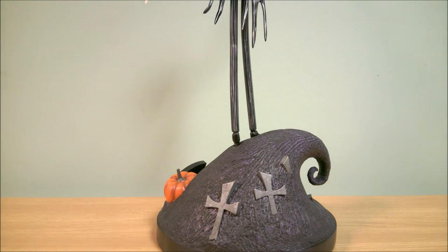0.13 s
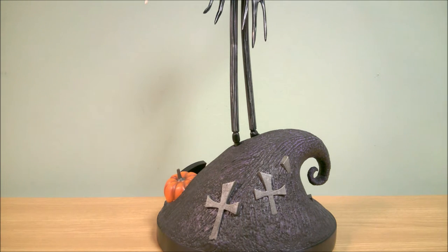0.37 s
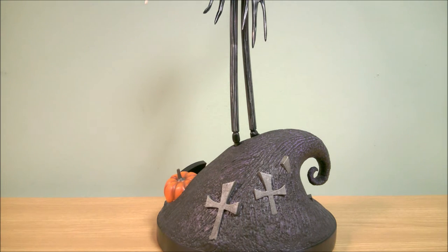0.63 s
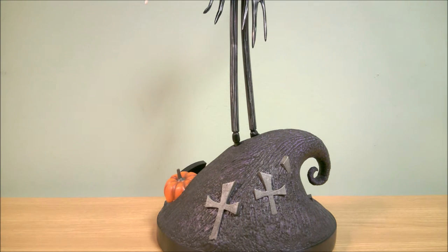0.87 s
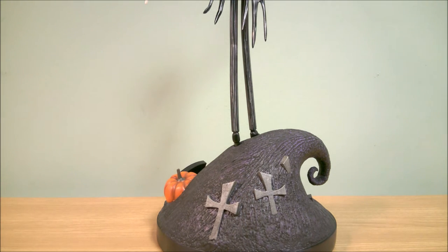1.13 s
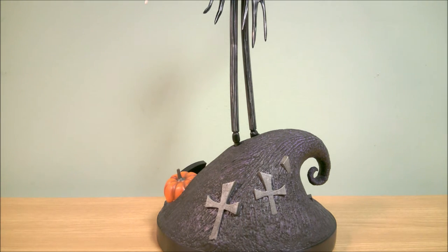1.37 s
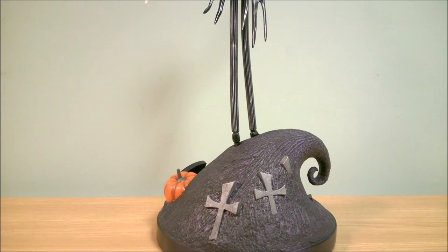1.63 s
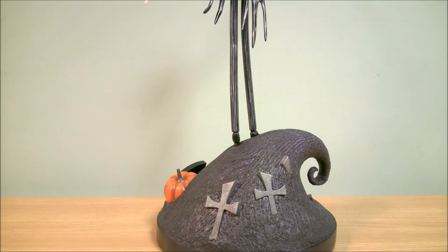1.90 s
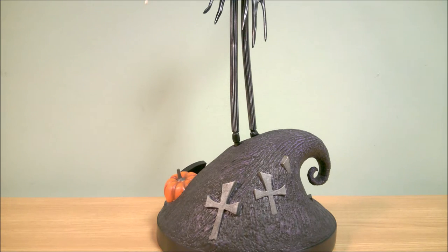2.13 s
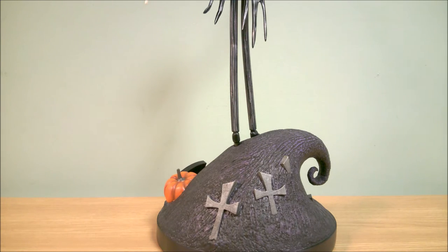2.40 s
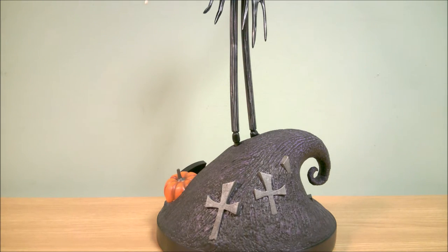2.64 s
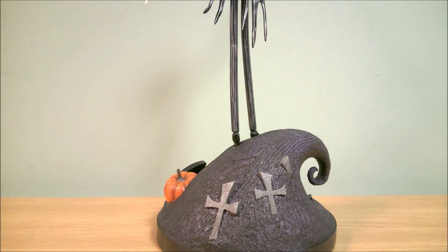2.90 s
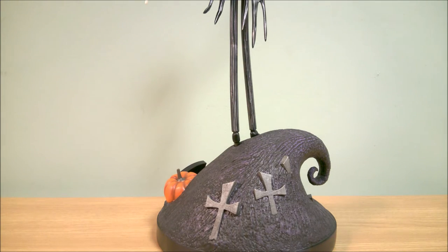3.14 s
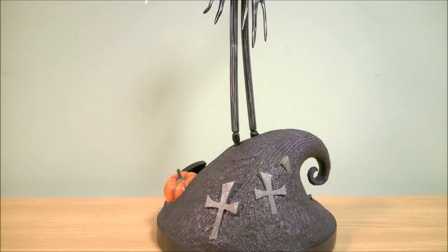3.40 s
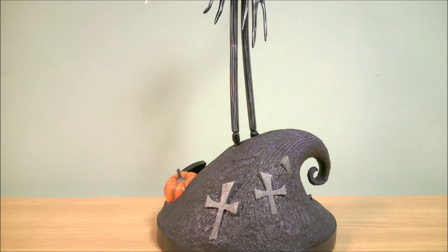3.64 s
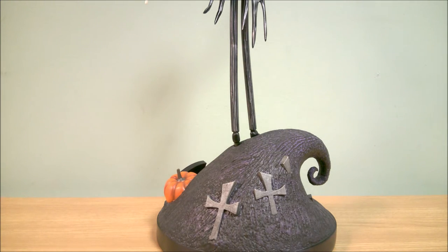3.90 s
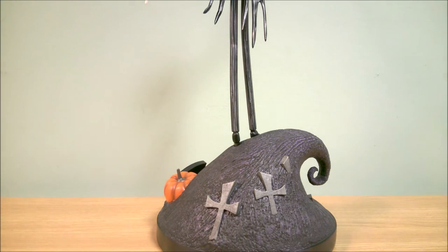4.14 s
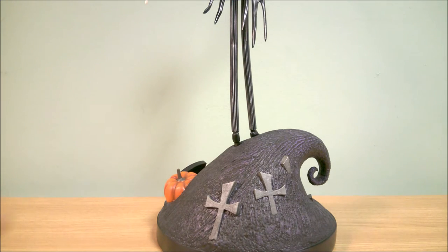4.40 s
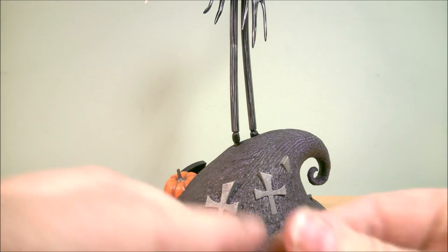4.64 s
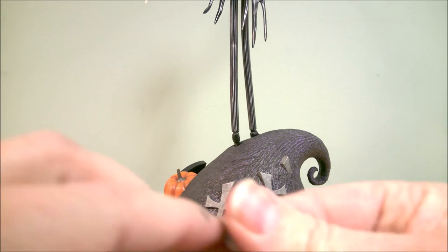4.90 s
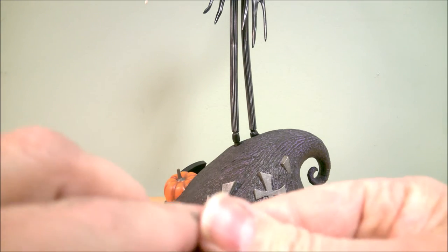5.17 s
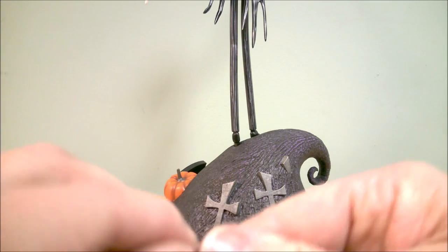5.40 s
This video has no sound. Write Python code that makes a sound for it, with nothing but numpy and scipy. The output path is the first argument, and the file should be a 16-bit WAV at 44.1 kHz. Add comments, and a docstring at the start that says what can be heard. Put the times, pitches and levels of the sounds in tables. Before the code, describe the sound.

Tacky crinkling clicks come in uneven clusters, some sharp and loud, with small hollow pops and grainy scuffs between. Soft table bumps sit under the start. Later it is nearly quiet until two wooden thumps with a low wobble, then a few tiny ticks. Close, dry, small-room sound with soft hiss and a very faint motor whine.

```python
"""Fingers knead sticky putty near a small camera in a quiet room: the skin lets go in short ringing snaps
with a treble tick, larger air pockets pop lower, and grainy noise bands make the rubbing in between.
Hands and arms bump the wooden table, twice hard: decaying modes ring while the whole table sways.
Behind it lie coloured hiss, low shaking, a wavering room hum and the faint harmonics of the camera's motor."""
import sys
import numpy as np
from scipy import signal
from scipy.fft import rfft, irfft
from scipy.io import wavfile

SR = 44100
rng = np.random.default_rng(int(sys.argv[2]) if len(sys.argv) > 2 else 0)


def level_to_linear(level):
    """Convert decibel levels to linear amplitude factors, elementwise."""
    exponent = np.asarray(level, float) / 20
    return 10 ** exponent


def int16_out(signal):
    """Quantize to a 16-bit WAV file."""
    q = np.round(np.clip(np.atleast_2d(signal).T, -1, 1) * 32767)
    wavfile.write(sys.argv[1], SR, q.astype(np.int16))


N = 243959


def evened(x):
    """Scales to rms 1."""
    return x / np.sqrt(np.mean(x ** 2) + 1e-20)


def curve(rows):
    """Joins (time_s, value) points by straight lines over the whole scene."""
    times, values = np.transpose(rows)
    return np.interp(np.arange(N) / SR, times, values)


def add(mix, s, sound):
    """Mixes a sound in at s seconds."""
    part = mix[round(s * SR):][:len(sound)]
    part += sound[:len(part)]


def resonate(x, hz, width_hz):
    """Shifts hz down to zero, smooths, shifts back: a resonance of gain 1."""
    turn = np.exp(2j * np.pi * np.cumsum(hz * np.ones(len(x))) / SR)
    r = np.exp(-np.pi * width_hz / SR)
    return 2 * (turn * signal.lfilter([1 - r], [1, -r], x / turn)).real


def wander(hz):
    """Slow random drift of rms 1, with little movement faster than hz."""
    roll_off = 1 + (np.fft.rfftfreq(N, 1 / SR) / hz) ** 4
    return evened(irfft(rfft(rng.standard_normal(N)) / roll_off, N))


def hiss():
    """Room and microphone hiss: white noise shaped by a smooth spectrum."""
    # colour of the hiss, before its overall level: pitch_hz, level_db (per Hz, relative)
    hiss_colour = [(20, -10.5), (65, -5), (130, -6.5), (200, -14), (332, -11), (590, -21), (800, -25.5),
                   (1300, -25.5), (2300, -24.5), (2800, -21.5), (3600, -26), (4800, -23), (7100, -50.5),
                   (15200, -33.5), (16400, -31)]
    hz = np.fft.rfftfreq(N, 1 / SR)
    f, db = np.transpose(hiss_colour)
    colour = level_to_linear(np.interp(np.log(hz + 1), np.log(f + 1), db, right=-90))
    noise = irfft(rfft(rng.standard_normal(N)) * colour, N)
    rms_above_100_hz = np.sqrt(np.mean(colour ** 2 * (hz > 100)))
    return level_to_linear(-61) * noise / rms_above_100_hz


def shaking():
    """Slow shaking under the camera: a hump of noise near 20 Hz that rises and falls."""
    # strength of the shaking: time_s, level_db (rms)
    shaking_level = [(0, -48.5), (.4, -57.5), (3.6, -63), (3.85, -41), (4.3, -58.5), (4.56, -43.5),
                     (4.74, -70), (5.2, -38), (5.53, -79)]
    hz = np.fft.rfftfreq(N, 1 / SR)
    hump = np.exp(-(np.log((hz + 1) / 20) / 0.5) ** 2)
    low = evened(irfft(rfft(rng.standard_normal(N)) * hump, N))
    return level_to_linear(curve(shaking_level)) * low


def drone():
    """Room hum: narrow bands of noise, heard as wavering tones."""
    # tones of the hum: pitch_hz, width_hz, level_db (rms)
    hum_tones = [(61.33, 5.3, -58), (255.8, 3.4, -68.5), (334.6, 9.9, -67.5), (378, 13, -72.5),
                 (586, 40, -70.5)]
    return sum(level_to_linear(db) * evened(resonate(rng.standard_normal(N), f, width)) for f, width, db in hum_tones)


def motor_whine():
    """Camera motor: harmonics of one drifting pitch, each following a common swing in its own measure."""
    # pitch of the first harmonic, before a small jitter: time_s, pitch_hz
    motor_pitch = [(0, 933), (2.7, 933.8), (3.9, 936.5), (5.1, 936.7), (5.53, 934)]
    # common swing in strength: time_s, level_db (relative)
    motor_swing = [(0, 8), (.4, -2.5), (1.2, 5.5), (2.5, -5.5), (3.2, -1), (3.7, 7.5), (5.1, 4.5), (5.5, 0)]
    # harmonics 1 to 5: level_db (rms before swing and flutter), share of the swing followed (0-1)
    motor_harmonics = [(-80.5, 0.68), (-81.5, .1), (-73.5, 0.36), (-69, 0.96), (-76, 0.048)]
    jitter_hz, flutter_db = 0.665, 1.43  # both rms
    turns = np.cumsum(curve(motor_pitch) + jitter_hz * wander(3.0)) / SR
    whine = np.zeros(N)
    for k, (db, share) in enumerate(motor_harmonics, start=1):
        level_db = db + share * curve(motor_swing) + flutter_db * wander(22.0)
        whine += level_to_linear(level_db) * np.sqrt(2) * np.sin(2 * np.pi * k * turns)
    return whine


def background():
    """The quiet bed: hiss, low shaking, room hum and motor whine."""
    return hiss() + shaking() + drone() + motor_whine()


def room(x):
    """Dense quick echoes off table and wall, then a faint longer tail, duller than the direct sound."""
    echo_t60, tail_t60 = 0.033, 0.16  # s
    echo_db, tail_db = -9, -14  # before the dulling
    t = np.arange(SR // 3) / SR
    taps = rng.standard_normal((2, len(t))) * (1 - np.exp(-t / 0.001))
    taps *= level_to_linear(-60 * t / np.array([[echo_t60], [tail_t60]]))
    response = level_to_linear([echo_db, tail_db]) @ (taps / np.linalg.norm(taps, axis=1, keepdims=True))
    dulled = signal.lfilter([0.6], [1, -0.4], response)
    return signal.fftconvolve(x, dulled)[:N]


def bumps():
    """A soft blow drives only the lower modes of the table; each lands on another spot, and the whole table sways."""
    # blows: start_s, level_db (relative), hardness as top_hz of the blow, sway_db of the whole table
    blows = [(.028, -52, 288, -68), (.064, -52.5, 895, -34.5), (0.083, -49.5, 298, -44.5),
             (.137, -45.5, 930, -31), (.15, -55, 500, -37.5), (0.908, -63.5, 500, -58),
             (2.243, -48, 1180, -56), (3.537, -58, 600, -63), (3.7771, -37.5, 1890, -33),
             (4.076, -37.5, 1560, -20.5), (4.0862, -44, 422, -39), (4.108, -42.5, 700, -25),
             (4.145, -52.5, 490, -29.5), (4.176, -47.5, 700, -37), (4.799, -65.5, 490, -58),
             (5.069, -50.5, 126, -43), (5.217, -51.5, 217, -74), (5.417, -55, 313, -49)]
    # main modes of the wooden table: pitch_hz, level_db (relative), t60_s
    table_modes = [(88.4, 9, 0.097), (150.8, 2.5, 0.31), (206.5, -2, 0.26), (279.6, -1, 0.22),
                   (306, 2.5, 0.17), (365.6, 9.5, 0.13), (541, 10, 0.078), (600, 13.5, 0.041),
                   (700, -1.5, 0.17), (857, -43, 0.51), (1119, 12, 0.045), (1448, 12, 0.11),
                   (1954, 7, 0.018)]
    sway_hz, sway_t60, sway_rise_s = 47, 1.23, 0.025
    crowd_db, crowd_t60 = -5.5, 0.13  # many small modes; t60 in s at 1 kHz
    out, t = np.zeros(N), np.arange(SR) / SR

    crowd_hz = np.geomspace(200, 6000, num=90) * rng.uniform(1.0, 1.03, size=90)
    crowd = [(f, crowd_db, crowd_t60 * (1000 / f) ** 0.23) for f in crowd_hz]
    hz, mode_db, t60 = np.transpose(table_modes + crowd)[:, :, None]
    # partly in step: a sharp first swing
    phase = np.r_[np.zeros(len(table_modes)), 0.7 * rng.random(len(crowd))][:, None]
    modes = level_to_linear(mode_db - 60 * t / t60) * np.sin(2 * np.pi * (hz * t + phase))
    modes *= 1 - np.exp(-(t / 0.0004) ** 2)  # soft onset

    sway = level_to_linear(-60 * t / sway_t60) * np.sin(2 * np.pi * sway_hz * t)
    sway *= 1 - np.exp(-t / sway_rise_s)

    spots_db = rng.uniform(-3.4, 5.1, (len(blows), len(hz)))
    for (s, db, top_hz, sway_db), spot_db in zip(blows, spots_db):
        reach = level_to_linear(spot_db) / (1 + (hz[:, 0] / top_hz) ** 2.22)
        add(out, s, level_to_linear(db) * reach @ modes + level_to_linear(sway_db) * sway)
    return out


def skin(count, hz, grain, treble_db):
    """Tiny slips, a few larger, mixed with smooth friction, in a broad band with some treble on top."""
    slips_per_s = 380
    smooth_width, grainy_width = 0.42, 0.68  # of each resonance, as a share of the centre
    sizes = level_to_linear(5.5 * np.minimum(rng.exponential(1, count), 2.6))
    slips = (rng.random(count) < slips_per_s / SR) * sizes
    slips = evened(slips * np.sign(rng.standard_normal(count)))
    drive = np.clip(grain, 0, 1) * slips + np.clip(1 - grain, 0, 1) * rng.standard_normal(count)
    # smooth friction sings in a narrower band
    width = (smooth_width + (grainy_width - smooth_width) * np.clip(2 * grain, 0, 1)) * hz
    band = evened(resonate(resonate(drive, hz, width), hz, width))
    treble = resonate(drive + 0.26 * rng.standard_normal(count), hz=10970, width_hz=6000)
    return band + level_to_linear(treble_db) * evened(treble)


def rub():
    """Skin scuffs swell fast and fade, over a faint steady sliding."""
    # faint sliding all along: time_s, level_db
    sliding_level = [(0.0, -66.5), (1.23, -61), (2.19, -68.5), (3.83, -65), (5.53, -68)]
    # bursts of scuffing and fine crackle: start_s, length_s (fade to about -11 dB), level_db,
    # centre_hz, graininess (0 smooth to 1 all slips)
    scuffs = [(0.055, 0.1, -53.5, 2880, 0.5), (0.128, 0.046, -41.5, 3120, .3),
              (0.138, 0.021, -59, 8500, 0.1), (0.232, 0.13, -53, 2730, 0.14), (0.568, 0.25, -56.5, 3670, 0),
              (0.653, 0.054, -43.5, 3620, 0.3), (0.67, 0.021, -74, 9000, 0.1), (0.74, 0.015, -52, 3600, .8),
              (0.88, 0.013, -41.5, 3500, 0.55), (0.892, 0.024, -42.5, 9800, 0.6),
              (1.014, 0.024, -46, 3150, 0.6), (1.302, 0.024, -53, 3160, 0.3), (1.33, 0.042, -48, 2790, .5),
              (1.508, 0.01, -53, 3770, 0.7), (1.85, 0.025, -40, 3400, 1), (1.849, .015, -69.5, 8000, .2),
              (1.896, 0.1, -57, 3270, .8), (2.208, 0.053, -56, 3530, 0.7), (2.242, 0.013, -43, 3300, 0.1),
              (2.243, 0.022, -60, 8600, 0.3), (2.347, 0.048, -57, 2850, 1),
              (2.539, 0.031, -48.5, 3380, 0.26), (2.827, 0.19, -54.5, 2940, 0.53),
              (3.166, 0.015, -51.5, 4240, 0), (3.534, 0.023, -40.5, 2950, 0.5),
              (3.568, 0.039, -51, 3630, 0.1), (3.776, 0.011, -41, 3080, 0.7),
              (4.0742, 0.0095, -38, 2780, 0.4), (4.151, 0.16, -60, 3240, 0.1),
              (5.419, 0.15, -56, 2180, 0.16)]
    out = level_to_linear(curve(sliding_level)) * skin(N, 3200, 0.3, treble_db=-22.5)
    for s, length, db, hz, grain in scuffs:
        u = np.arange(SR // 3) / SR / length  # time in lengths of the scuff
        swell = (1 - np.exp(-u / 0.1)) * np.exp(-u ** 2 * 1.22)
        add(out, s, level_to_linear(db) * skin(len(u), hz, grain, treble_db=-29.5) * swell)
    return out


def trapped_air(t, hz, t60):
    """A pocket of air rings briefly, a little late."""
    rise_s = 0.00064
    return np.sin(2 * np.pi * hz * t) * level_to_linear(-60 * t / t60) * (1 - np.exp(-t / rise_s))


def pops():
    """Larger air pockets burst, each with its own pitch and a weaker neighbour just above."""
    # bursts: start_s, level_db (of the main ring), pitch_hz
    bursts = [(0.112, -40, 614), (0.137, -30.5, 760), (0.152, -34, 727), (0.668, -28, 697),
              (0.862, -36.5, 755), (0.881, -23.5, 761), (0.886, -33, 904), (0.907, -38, 933),
              (0.932, -35.5, 614), (1.3, -38.5, 600), (1.324, -36.5, 670), (1.351, -26.5, 1068),
              (1.512, -38.5, 610), (1.853, -37, 604), (1.942, -41, 646), (2.207, -43, 630),
              (2.241, -33, 573)]
    t60 = 0.034  # s
    out, t = np.zeros(N), np.arange(2600) / SR
    for (s, db, hz), u in zip(bursts, rng.random(len(bursts))):
        neighbour = trapped_air(t, hz * (1.0 + 0.59 * u), t60)
        add(out, s, level_to_linear(db) * (trapped_air(t, hz, t60) + 0.75 * neighbour))
    return out


def snaps():
    """Each release rings a few cycles on two pitches, with a treble tick; finger flesh and trapped air answer lower."""
    # clearest releases of the putty: peak_s, level_db, ring_hz, rise_ms (before the floor below),
    # body_db of the finger relative to the ring
    releases = [(0.0646, -27, 2850, 0.16, -22), (0.0669, -29, 3040, 0.24, -13),
                (.0944, -40, 2920, 0.15, 9.5), (0.1135, -31.5, 3200, 0.17, -2),
                (0.1384, -22, 3130, 0.14, -3), (0.1477, -19.5, 3770, 0.18, -5),
                (0.1497, -24.5, 3000, 0.16, -9), (.1529, -25.5, 3470, 0.2, 0.5),
                (0.214, -40, 2770, 0.17, 12.5), (.2568, -23.5, 3130, 0.19, 3.5),
                (0.26, -26.5, 3050, 0.37, 0), (0.3175, -27, 4020, 0.16, -3.5), (0.65, -22, 4080, 0.19, -10),
                (0.6603, -26.5, 3780, 0.3, -1.5), (0.6703, -14, 4140, 0.15, -2.5),
                (.687, -28, 3420, 0.2, 4), (.7, -26.5, 3800, 0.16, 0.5), (.7349, -28, 3460, 0.36, -12),
                (.741, -21.5, 3700, .19, -0.5), (.7365, -30, 3670, 0.47, -19), (0.757, -28, 4620, 0.71, 1),
                (.8086, -36.5, 3680, 0.41, -6), (.8316, -31, 3780, 0.15, -18), (.85, -35, 3400, 0.35, -1),
                (0.8633, -19, 3200, 0.38, -9), (0.8821, -9.5, 2960, 0.39, -13),
                (.8853, -29, 2980, 0.75, -25), (0.888, -15, 4200, 0.36, -15),
                (0.8916, -18.5, 3500, 0.32, -6), (.9, -18, 4370, 0.18, -3),
                (0.909, -21.5, 3340, 0.17, -2.5), (0.9328, -30.5, 3200, .19, 1),
                (0.9827, -37.5, 3400, .19, 1), (1.0252, -21, 3420, 0.2, -29),
                (1.0375, -17, 3450, 0.28, -24), (1.0387, -18, 2400, 0.53, -8),
                (1.0728, -21, 3200, 0.43, -41), (1.238, -22, 3500, 0.27, -5.5),
                (1.287, -10, 3900, 0.28, -33), (1.301, -32, 3750, .19, 4), (1.3048, -30.5, 2880, 0.24, -4),
                (1.3231, -21.5, 3460, 0.4, -12), (1.325, -16, 4100, 0.36, -7), (1.3511, -13, 4110, 0.54, 1),
                (1.4575, -37.5, 3440, 0.3, -3), (1.5128, -13, 3740, .48, -9),
                (1.5352, -20.5, 4040, 0.36, -15.5), (1.6317, -37.5, 3240, 0.55, -7),
                (1.8483, -7.5, 4100, 0.32, -22), (1.852, -58, 4020, 0.39, -20),
                (1.875, -23, 3830, 0.82, -12), (1.911, -37.5, 4040, 0.6, -6), (1.92, -38, 3970, 0.6, -4),
                (1.9432, -31, 3600, 0.36, 0), (2.2087, -20.5, 3660, .57, -11.5),
                (2.223, -22.5, 3500, 0.16, -9), (2.234, -31, 2880, 0.58, -5),
                (2.2421, -14.5, 3450, 0.52, 2.5), (2.2448, -18, 3900, 0.53, -3),
                (2.248, -25.5, 2670, 0.46, -14), (2.2554, -20, 4000, 0.39, -6),
                (2.2592, -8.5, 3680, 0.26, -25), (2.3606, -38, 2970, .23, -13),
                (2.3761, -36, 2920, .19, -10), (2.5586, -34, 3770, .19, -13), (2.5656, -30, 4270, 0.38, -3),
                (2.7188, -33, 3500, 0.11, -3.5), (2.8712, -36.5, 3030, 0.32, -8),
                (3.2102, -29.5, 3900, 0.2, 0), (3.3115, -31, 3650, 0.35, -36), (3.5283, -34, 2860, 1, -18),
                (3.5448, -29, 3200, 0.17, -6), (3.5887, -31.5, 3670, .19, -4),
                (4.163, -46.5, 4400, 0.41, -18), (4.228, -42, 3140, 0.51, -14),
                (4.292, -39, 3000, 0.12, 5.5), (5.4168, -34.5, 2940, 0.28, -6)]
    # flesh of the fingers, pitches scattered from snap to snap: middling pitch_hz, level_db (relative)
    flesh = [(1500, -9.5), (2150, -3)]
    # treble partials of the tick, pitches scattered likewise: lowest pitch_hz (nearly), level_db (relative)
    tick_partials = [(6500, 6), (8200, 9), (10500, 9), (13000, 10), (15000, 5.5)]
    # strength of the tick under a middling ring: time_s, level_db (relative)
    tick_strength = [(0, -38), (.6, -33.5), (1.05, -34.5), (1.1, -45), (1.3, -45.5), (1.8, -46.5),
                     (2.3, -40), (5.53, -36)]
    # hollow between the palms, pitches scattered likewise: middling pitch_hz, t60_s
    hollow = [(600, 0.093), (800, 0.078), (1080, 0.084)]
    shortest_ms, tick_ms = 0.23, 0.35
    middling_db, tick_growth = -24, 0.33  # extra tick dB for each dB of a harder snap
    tick_spread_db, hollow_db = 8, -33
    out, t = np.zeros(N), np.arange(2600) / SR
    thin = signal.butter(2, 900, "high", fs=SR)  # so small a source radiates no bass

    for (s, db, hz, rise_ms, body_db), u in zip(releases, rng.random((len(releases), 8))):
        tau = max(rise_ms, shortest_ms) / 1000
        shape = (t / tau * np.exp(1 - t / tau)) ** 2
        ring = np.sin(2 * np.pi * (hz * t + u[0]))
        ring += 0.45 * np.sin(2 * np.pi * (hz * (1.12 + 0.35 * u[1]) * t + u[2]))

        body_shift = 0.843 + 0.47 * u[3]
        body = sum(level_to_linear(g) * np.sin(2 * np.pi * (f * body_shift * t + u[4])) for f, g in flesh)
        ring += level_to_linear(body_db) * body * np.exp(t / tau * 0.14).clip(1, 30)  # rings a little longer

        tick_shift = 0.987 + 0.22 * u[6]
        tick = sum(level_to_linear(g) * np.sin(2 * np.pi * f * tick_shift * t) for f, g in tick_partials)
        tick *= np.exp(-((t - tau) * 1000 / tick_ms) ** 2)
        tick_db = np.interp(s, *np.transpose(tick_strength))
        tick_db += tick_growth * (db - middling_db) + tick_spread_db * (u[7] - 0.5)
        click = signal.lfilter(*thin, ring * shape + level_to_linear(tick_db) * tick)

        shares = u[[5, 7, 1]] ** 2  # each snap favours its own mode of the hollow
        air_shift = 0.84 + 0.302 * u[5]
        air = sum(a * trapped_air(t, f * air_shift, t60) for (f, t60), a in zip(hollow, shares))
        add(out, s - tau, level_to_linear(db) * (click + level_to_linear(hollow_db) * air))
    return out


def scene():
    """Hands and table in the room, over the background."""
    near = snaps() + pops() + bumps() + rub()
    return (near + room(near) + background())[None]


def top_cut(x):
    """Nothing passes above the cut-off."""
    return signal.sosfilt(signal.butter(12, 16710, fs=SR, output="sos"), x)


def record(dry):
    """The small microphone loses the top: a gentle low-pass at 12 kHz."""
    low_pass = signal.butter(2, 12000, fs=SR)
    mix = signal.lfilter(*low_pass, dry)
    return top_cut(mix)


dry = scene()
out = record(dry)
int16_out(out)
```